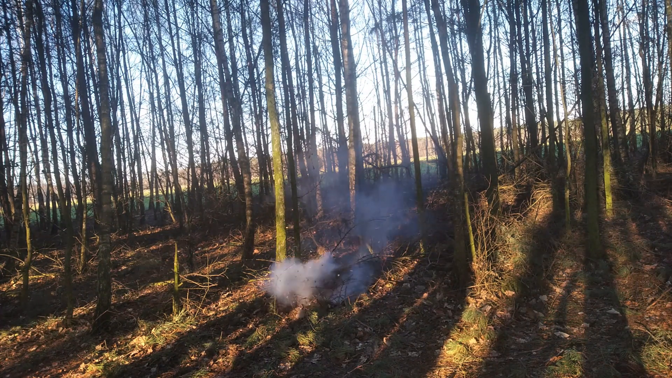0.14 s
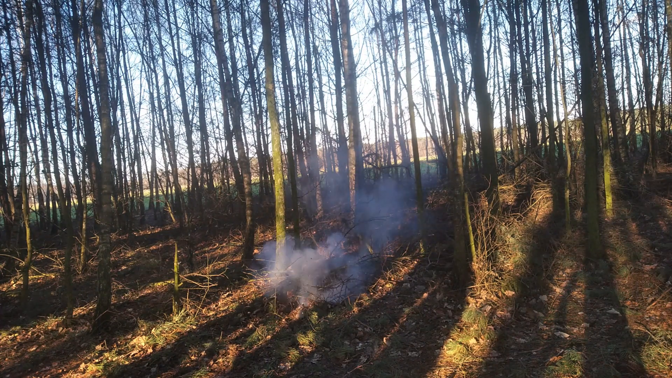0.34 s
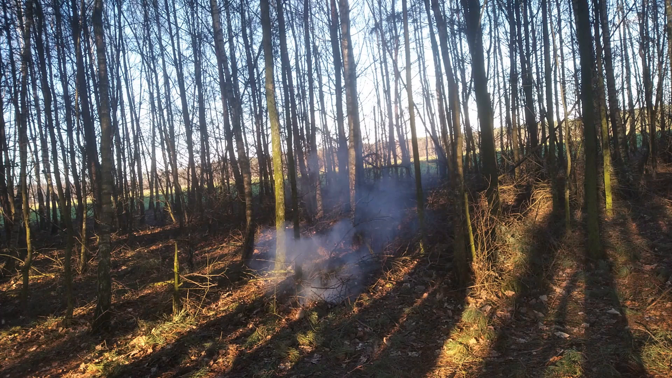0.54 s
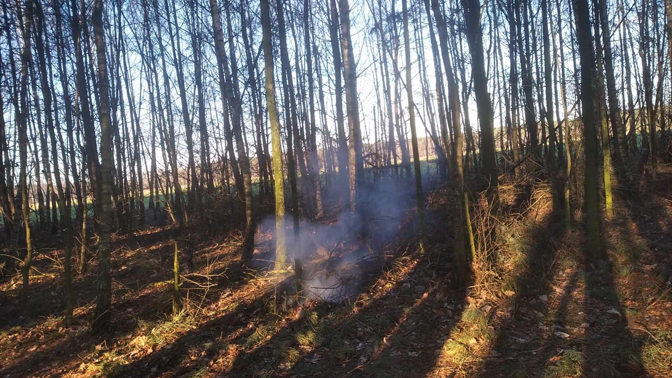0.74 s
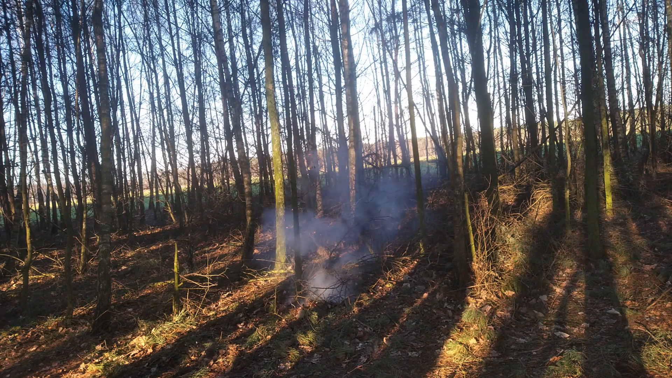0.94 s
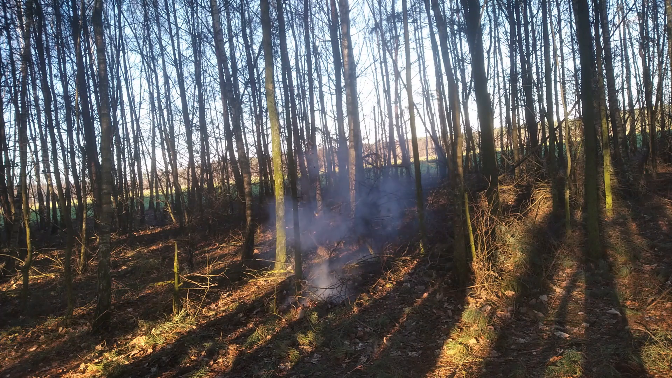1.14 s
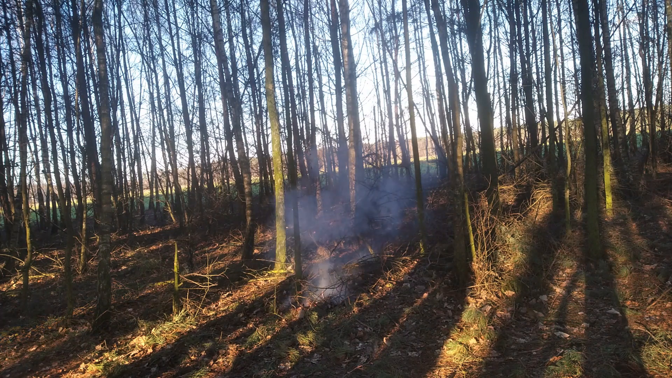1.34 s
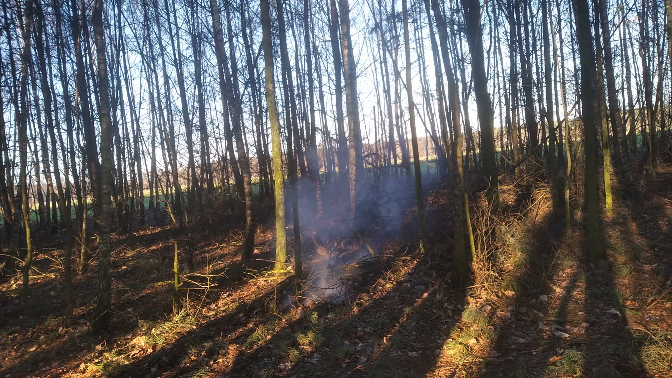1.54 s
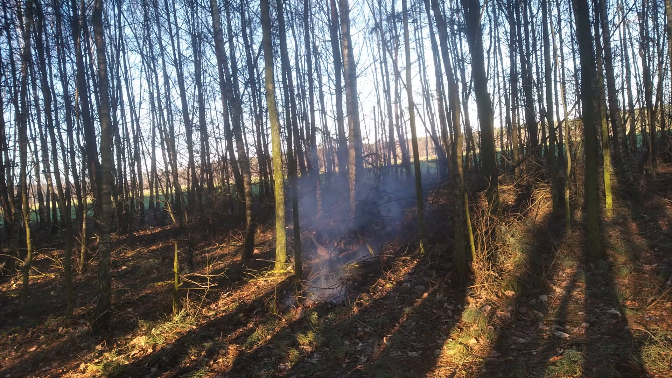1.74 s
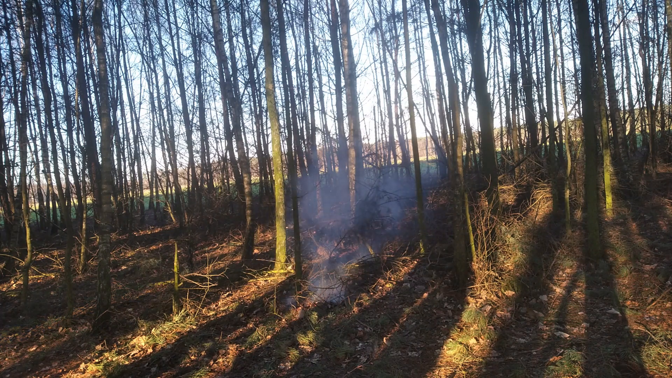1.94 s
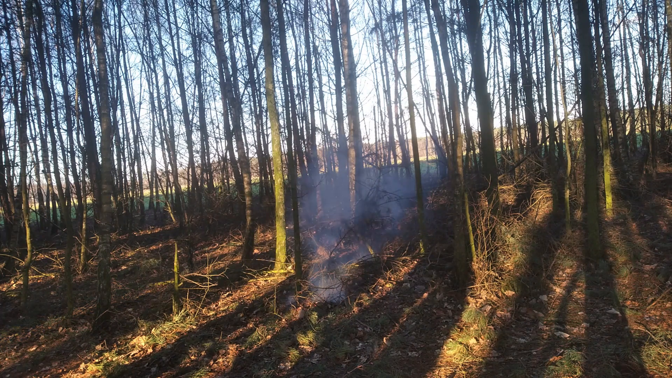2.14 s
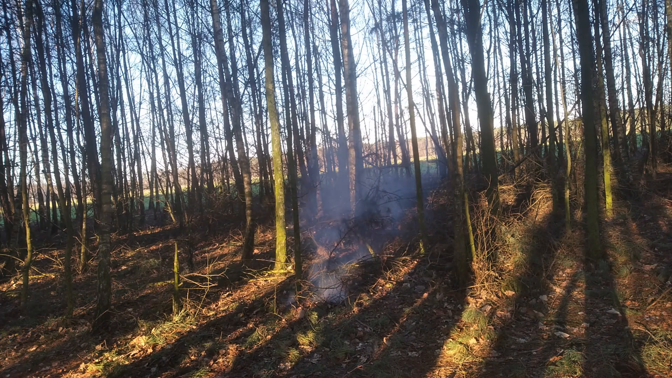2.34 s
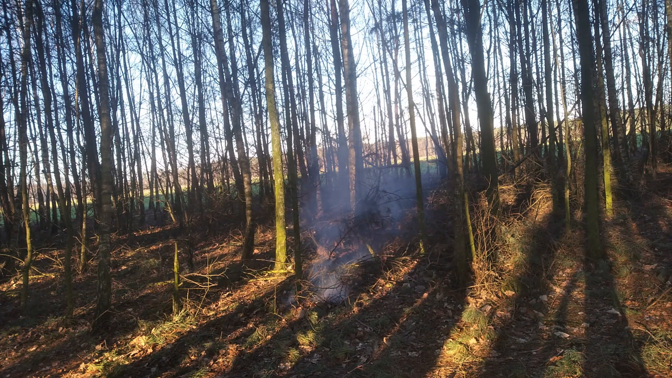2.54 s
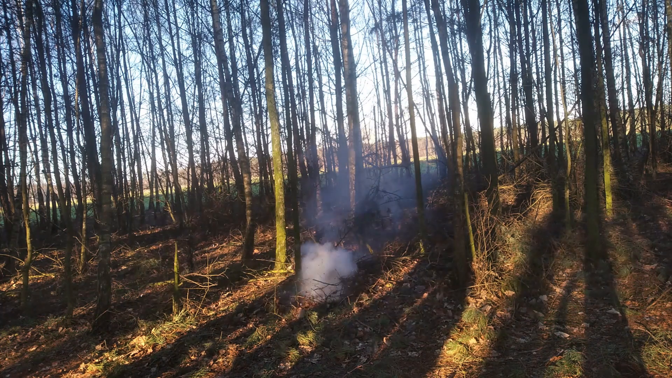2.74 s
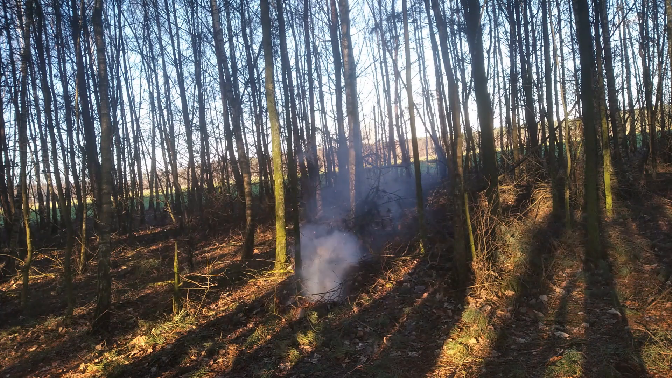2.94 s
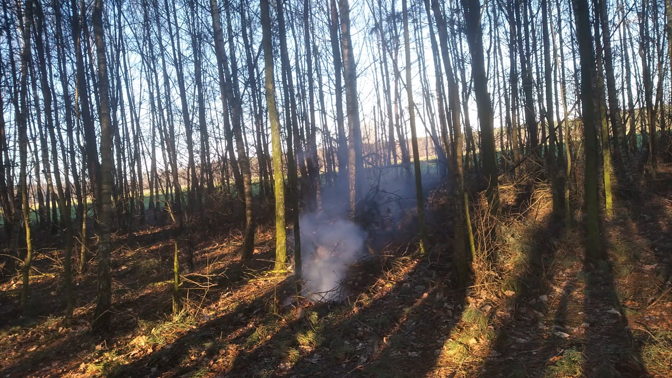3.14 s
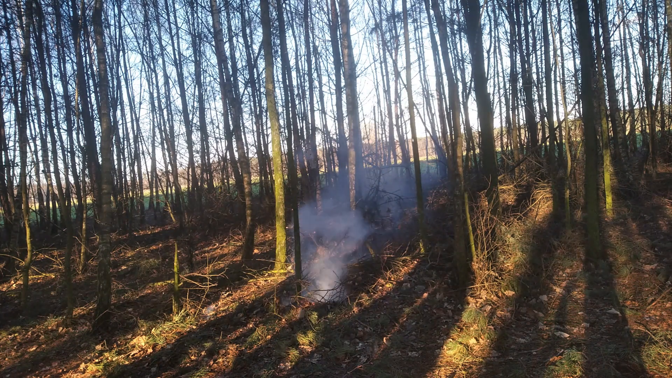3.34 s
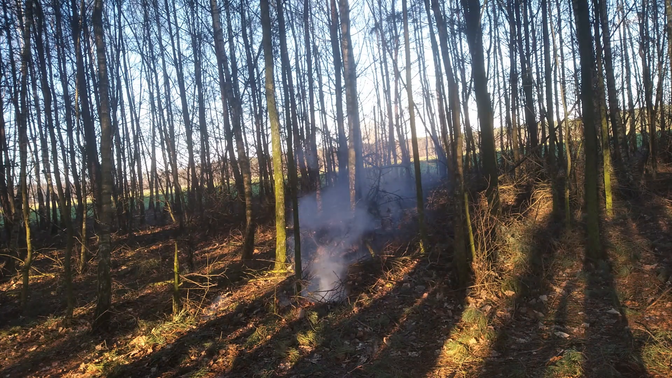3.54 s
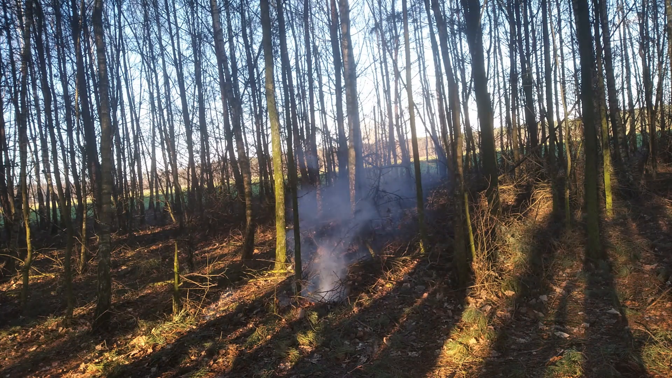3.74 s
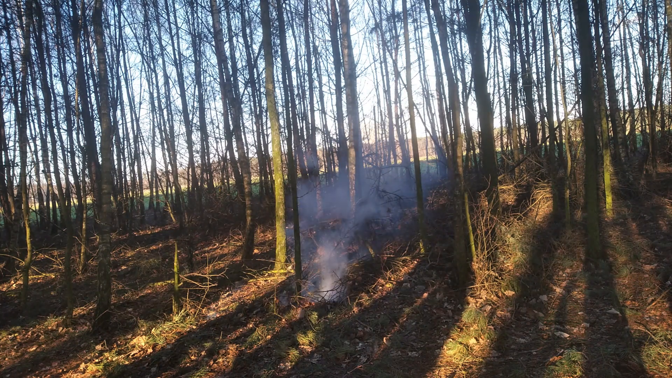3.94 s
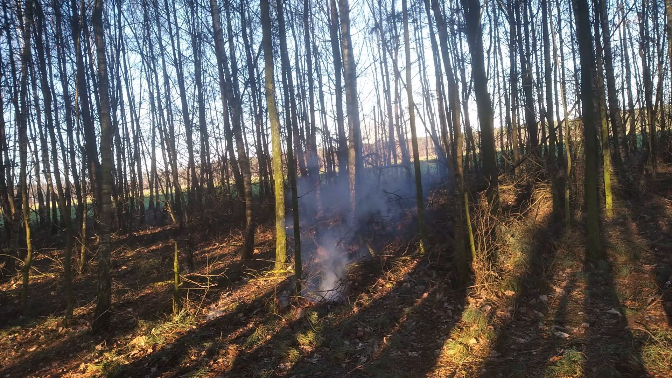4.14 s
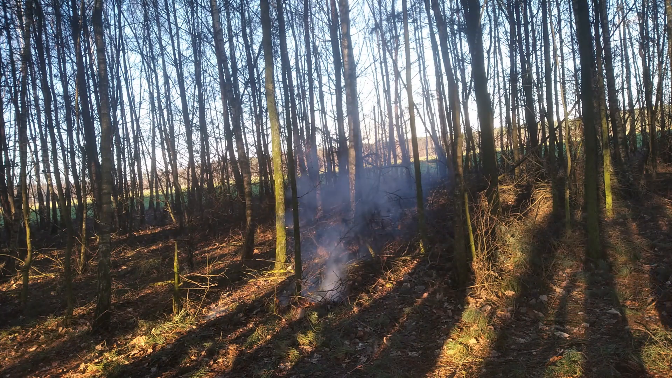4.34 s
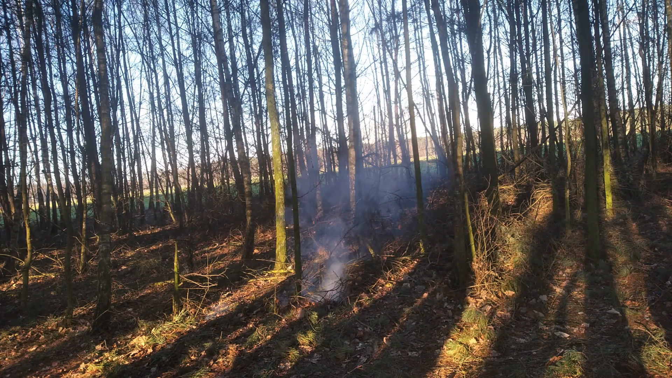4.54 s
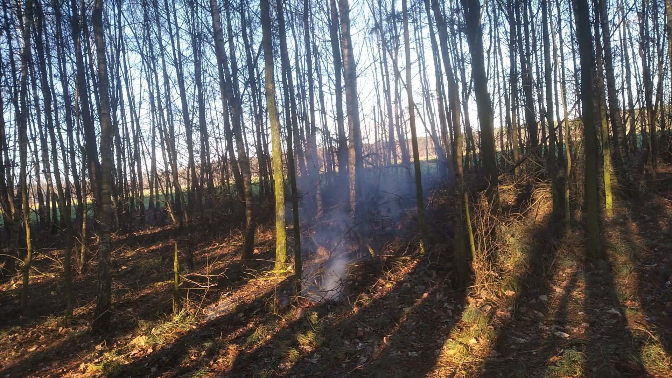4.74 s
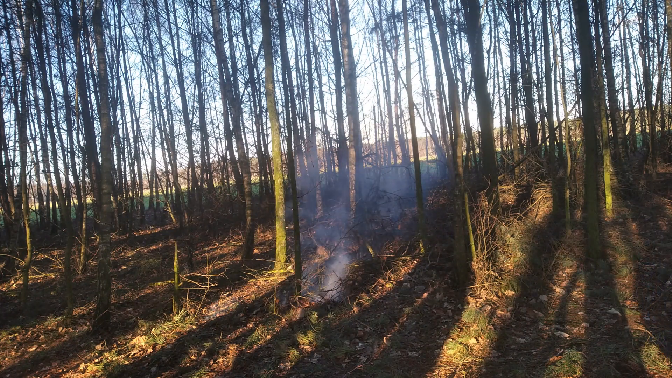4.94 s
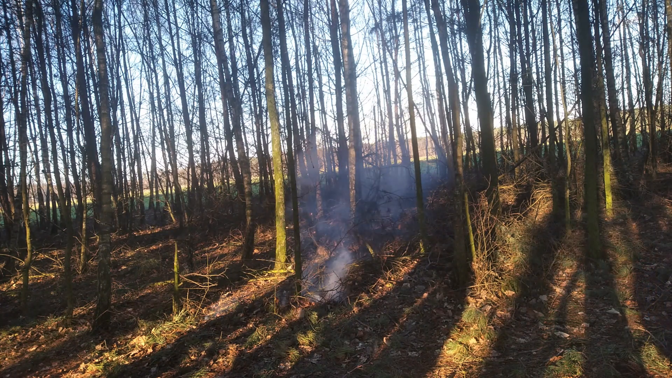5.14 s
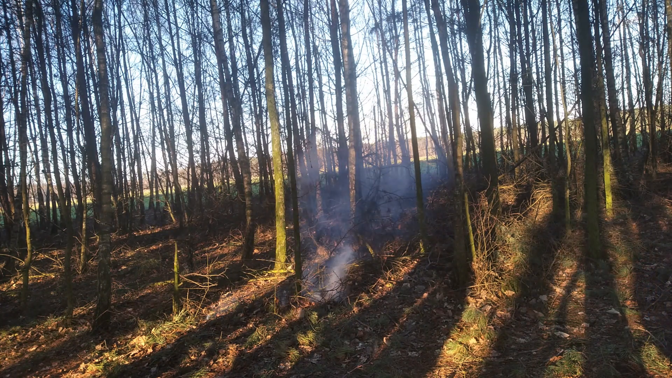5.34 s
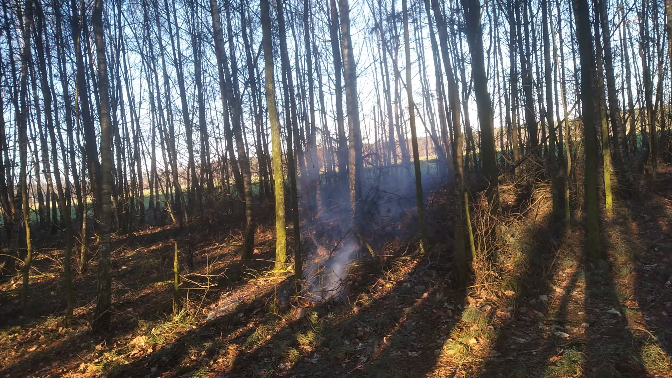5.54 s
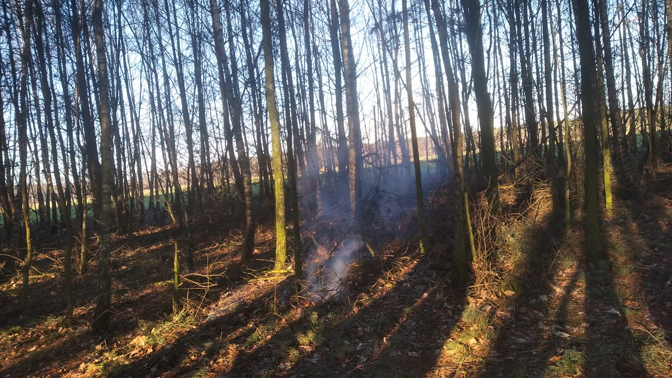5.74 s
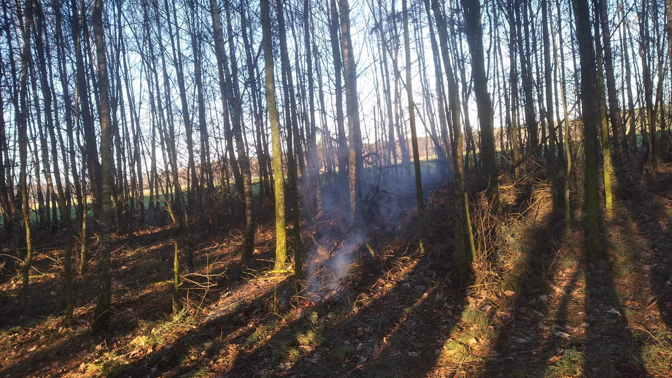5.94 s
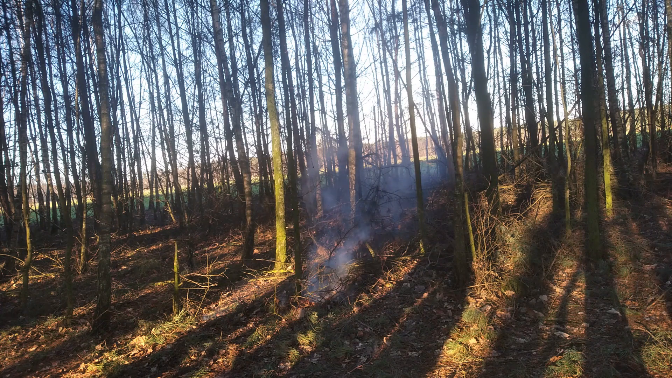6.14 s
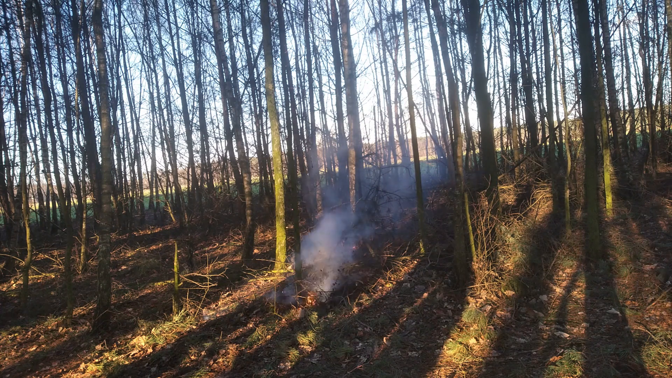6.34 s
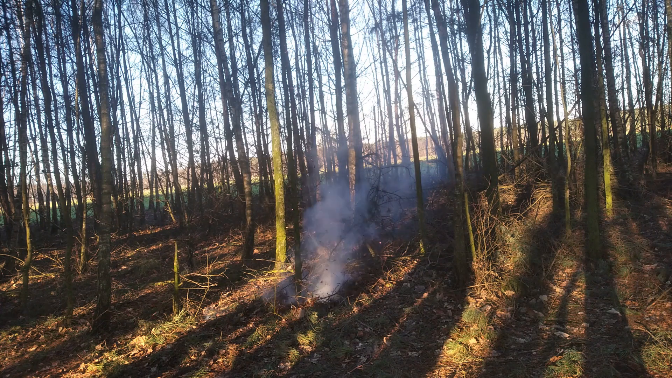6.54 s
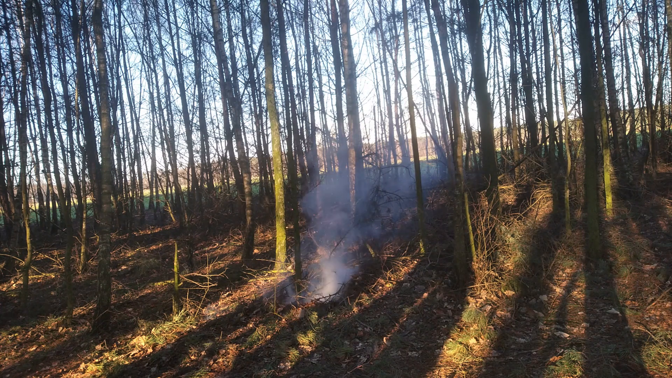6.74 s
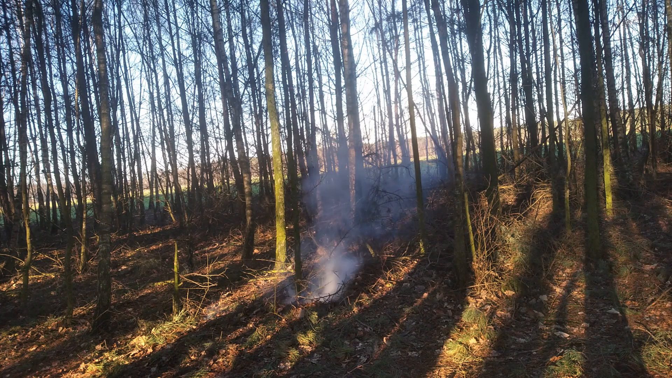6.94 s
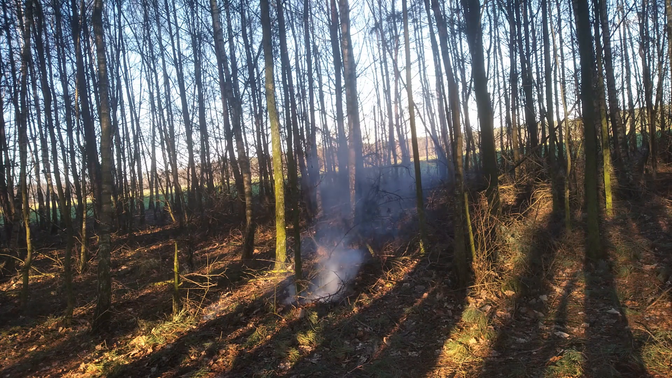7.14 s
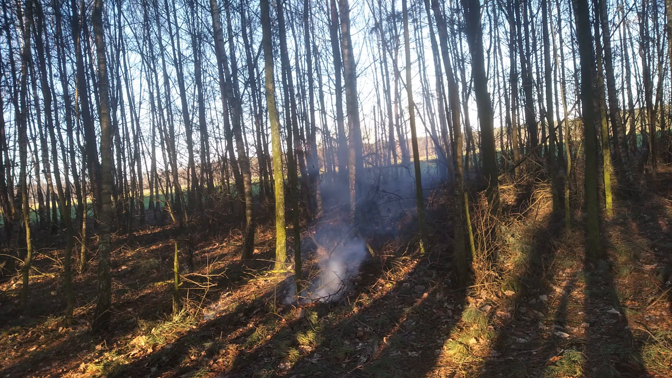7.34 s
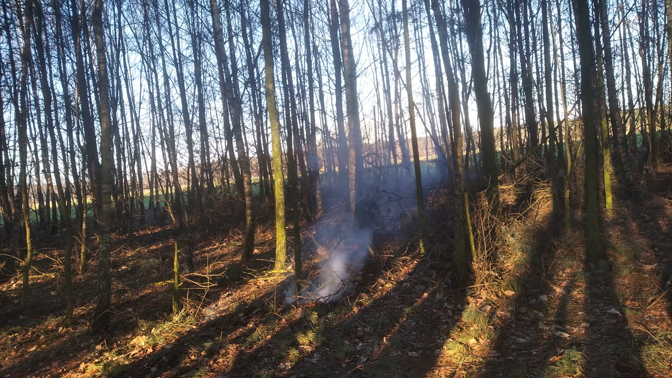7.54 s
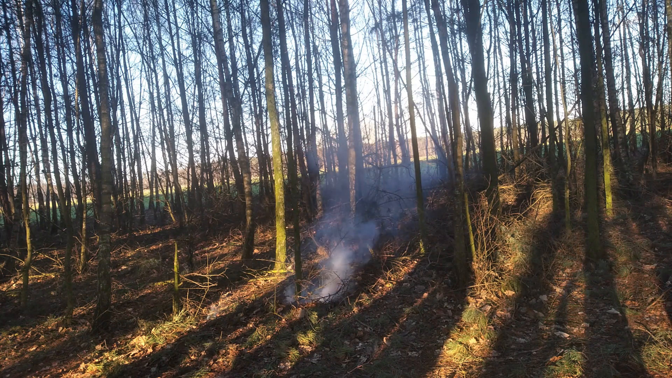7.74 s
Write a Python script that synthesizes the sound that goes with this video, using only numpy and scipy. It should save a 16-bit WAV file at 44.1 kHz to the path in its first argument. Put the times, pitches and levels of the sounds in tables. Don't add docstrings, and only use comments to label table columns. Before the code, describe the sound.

Three small firecrackers explode one by one in a bare wood, each sharp overloaded bang scattering into a long dulling tail, with faint fuse hiss between.

```python
import sys
import numpy as np
from scipy import signal
from scipy.io import wavfile
from scipy.ndimage import uniform_filter1d

SR = 44100
rng = np.random.default_rng(int(sys.argv[2]) if len(sys.argv) > 2 else 0)


def field_ratio(decibels):
    return 10 ** (np.asarray(decibels, dtype=float) / 20)


def unload_audio(sound):
    columns = np.transpose(np.atleast_2d(sound))
    steps = np.round(np.clip(columns, -1, 1) * 32767)
    wavfile.write(sys.argv[1], SR, steps.astype(np.int16))


N = 347508


def evened(x):
    return x / np.sqrt(np.mean(x ** 2) + 1e-20)


def smoothed(grid, rows, columns):
    return uniform_filter1d(uniform_filter1d(grid, size=rows, axis=0), size=columns, axis=1)


def read(points, hz):
    f, value = np.transpose(points)
    return np.interp(np.log(hz + 1), np.log(f + 1), value)


def along(table):
    s, *columns = np.transpose(table)
    return [np.interp(np.arange(N) / SR, s, c) for c in columns]


def arch(start, length):
    u = (np.arange(N) / SR - start) / length
    return np.sin(np.pi * u, where=(u > 0) & (u < 1), out=np.zeros(N))


def add(mix, s, sound):
    part = mix[:, round(s * SR):][:, :sound.shape[1]]
    part += sound[:, :part.shape[1]]


def hiss(count, size, gain, same, side_db, lead=None, patchy_db=1.5):
    hop = size // 4
    t = np.arange(count // hop + 5) * hop / SR
    hz = np.fft.rfftfreq(size, 1 / SR)[:, None]
    a, b, c, d, patches = rng.standard_normal((len(t), len(hz), 5)).T
    patches = evened(smoothed(patches, 7, 11))
    like = np.clip(same(hz), -1, 1)
    right = a + 1j * b
    left = like * right + np.sqrt(1 - like ** 2) * (c + 1j * d)
    if lead:
        left = left * np.exp(1j * lead(hz))
    tilt = field_ratio(side_db(hz) / 2)
    z = np.array([left * tilt, right / tilt]) * gain(hz, t) * field_ratio(patchy_db * patches)
    return signal.istft(z, nperseg=size, noverlap=size - hop)[1][:, :count]


def blast(t):
    u = t / 0.0004
    front = (1 - u) * np.exp(-u)
    return front - 0.15 * np.roll(front, round(0.0015 * SR))


# pitch in Hz, level in dB.
TRUNKS = [(60, -17), (130, -6.5), (280, -3), (500, -2.5), (1000, -3.5), (2200, -4), (5000, -4.5),
          (9000, -5), (12000, -6.5), (17000, -20.5)]
# pitch in Hz, time to fall 60 dB in seconds.
TRUNKS_T60 = [(60, 1.5), (150, 0.8), (400, 1.1), (1000, 1.05), (2500, 0.88), (5000, 0.68), (10000, 0.47),
              (16000, 0.22)]
BEND, STRETCH = 0.88, 1.01
# pitch in Hz, level in dB.
BOOM = [(40, -7.5), (120, 4.5), (300, 13.5), (480, 10), (800, -9.5), (1500, -49.5)]
# pitch in Hz, level in dB.
FAR_EDGE = [(60, -48.5), (140, -44), (220, -53), (330, -20), (500, -15), (900, -16), (2200, -24),
            (4000, -39), (8000, -87.5)]
BOOM_T60, FAR_T60 = 0.17, 1.9
# delay in seconds, spread in seconds, pitch in Hz, width in Hz.
SLOPE = (1.06, .12, 145, 28)
SLOPE_DB = -48.5
# pitch in Hz, likeness from -1 to 1.
TAIL_SAME = [(60, -0.65), (110, 1), (200, 0.68), (380, 0.92), (700, -0.00099), (1290, -0.4), (2380, 0.05),
             (4400, -0.03), (8120, -0.0), (15000, -0.91)]
# pitch in Hz, left over right in dB.
TAIL_SIDE = [(100, 0), (1400, 1), (3500, 0), (6000, 0.5), (7500, -6), (9300, -13), (11000, -6.5),
             (15000, 4)]


def scatter(length):
    delay, spread, slope_hz, width_hz = SLOPE

    def fade(hz, t):
        build = 1 - 0.21 * np.exp(-t / 0.017)
        age = (t / (STRETCH * length * read(TRUNKS_T60, hz))) ** BEND
        near = build * field_ratio(read(TRUNKS, hz) - 60 * age)
        boom = field_ratio(read(BOOM, hz) - 60 * t / BOOM_T60)
        far = field_ratio(read(FAR_EDGE, hz) - 60 * t / FAR_T60)
        late, off_pitch = (t - delay) / spread, (hz - slope_hz) / width_hz
        slope = field_ratio(SLOPE_DB) * np.exp(-late ** 2 / 2 - off_pitch ** 2 / 2)
        return np.sqrt(near ** 2 + boom ** 2 + far ** 2 + slope ** 2)

    tail = hiss(5 * SR // 2, 1024, fade, same=lambda hz: read(TAIL_SAME, hz),
                side_db=lambda hz: read(TAIL_SIDE, hz), patchy_db=0.0)
    return tail / np.sqrt(np.mean(tail[:, :SR // 20] ** 2))


def jolt(t):
    onset = 1 - np.exp(-t / .004)
    left_size = np.exp(-t / .07) + .03 * np.exp(-t / .3)
    left = left_size * np.cos(2 * np.pi * (1 - np.exp(-t / .245))) * onset
    right_size = 4.5 * np.exp(-t / .035) + .37 * np.exp(-(t / .42) ** 2)
    right = right_size * np.sin(3 * np.pi * np.tanh((t + .008) / .33)) * onset
    return np.array([left, right])


# start in seconds, blast level in dB, tail level in dB, tail length factor.
BANGS = [
    (0.0517, 21, 10.5, 0.98),
    (2.6188, 21.5, 9.5, 0.99),
    (6.2090, 9, 9.5, 1.0),
]
JOLTS = [
    (.15, -1.15),
    (8.0, -.8),
    (1.2, -1.0),
]


def bangs():
    out, t = np.zeros((2, N)), np.arange(5 * SR // 2) / SR
    for (s, blast_db, tail_db, length), lurch in zip(BANGS, JOLTS):
        tail = scatter(length) * (1 - np.exp(-t / 0.00083))
        shock = field_ratio(blast_db) * blast(t)
        add(out, s, shock + field_ratio(tail_db) * tail + jolt(t) * np.array(lurch)[:, None])
    return out


# time in seconds, burn level in dB, sputter share in dB.
SMOULDER = [(0, -60, -11), (.55, -58.5, -10), (.75, -54, -7), (1.8, -54, -7), (2.3, -56.5, -6.5),
            (2.6, -53.5, -9.5), (3.3, -55.5, 0), (3.55, -58.5, -24), (3.86, -57.5, -20),
            (4.25, -54.5, -3.5), (4.6, -57, -4.5), (5.4, -56, -4), (6.1, -59, -8.5), (6.9, -55, -3.5),
            (7.15, -57, -21), (7.6, -54.5, -4.5), (7.88, -57.5, -2.5)]
# start in seconds, length in seconds, level in dB, sputter share in dB.
FLARES = [
    (0.676, 0.56, -53.5, -4.5),
    (1.29, .3, -56.5, -8),
    (3.878, 0.19, -49.5, -11.5),
    (3.994, 0.2, -47.5, -12.5),
    (4.244, 0.28, -60, -1),
    (6.148, .02, -54, -8),
    (7.262, 0.31, -47, -6.5),
    (7.346, 0.057, -45, -9),
]
FLARE_EDGE = 0.68
# pitch in Hz, level in dB.
FIZZ = [(2350, -40), (4000, -4), (6110, -0.5), (6980, 0.5), (8050, 2), (10200, 0), (11100, -3),
        (13700, -3.5), (14200, -12.5)]
# pitch in Hz, level in dB.
SPUTTER = [(500, -21), (1000, -7.5), (1600, -1), (2200, 1.5), (3300, 1), (5000, -0.5), (8000, -17.5),
           (12000, -62.5)]
# pitch in Hz, likeness from 0 to 1.
FUSE_SAME = [(900, 0.96), (3300, 0.76), (5000, 0.22), (7000, .4), (10000, .35), (14000, 0.23)]
# pitch in Hz, left over right in dB.
FUSE_SIDE = [(900, -1), (3300, 2), (6000, 0), (7500, -5), (9200, -13), (11000, -6), (14000, 0.5)]
# pitch in Hz, lead in radians.
FUSE_LEAD = [(3400, -.2), (5900, -2.2), (8400, -2.3), (11300, -.3)]


def fuse():
    burn_db, dull_db = along(SMOULDER)
    bright, dull = field_ratio(2 * burn_db), field_ratio(2 * (burn_db + dull_db))
    for start, length, db, share_db in FLARES:
        power = (field_ratio(db) * arch(start, length) ** FLARE_EDGE) ** 2
        bright = bright + power
        dull = dull + power * field_ratio(2 * share_db)
    place = dict(same=lambda hz: read(FUSE_SAME, hz), side_db=lambda hz: read(FUSE_SIDE, hz),
                 lead=lambda hz: read(FUSE_LEAD, hz))
    fizz = hiss(N, 256, lambda hz, t: field_ratio(read(FIZZ, hz)) * (hz < 14250), patchy_db=1.1, **place)
    sputter = hiss(N, 512, lambda hz, t: field_ratio(read(SPUTTER, hz)), patchy_db=-1.06, **place)
    flicker = evened(uniform_filter1d(rng.standard_normal(N), size=500))
    burn = np.sqrt(bright) * evened(fizz) + np.sqrt(dull) * evened(sputter)
    return field_ratio(7.5 + 1.1 * flicker) * burn


# start in seconds, peak in dB, ring in Hz, left over right in dB, swell in ms.
SPITS = [
    (4.4413, -29.5, 8600, -4, 0.42),
    (4.813, -37.5, 10000, -1, 0.29),
    (5.0708, -20, 7400, -5.5, 0.062),
    (5.0714, -32.5, 2540, 6, 0.12),
    (5.862, -34.5, 6000, -1.5, .06),
    (6.1513, -34, 9630, -7, .15),
    (6.155, -31, 7120, -4, 0.099),
    (6.1558, -31.5, 9960, 0, .2),
    (6.953, -29, 7500, -5, .08),
    (7.388, -28, 2500, -4.5, 0.061),
]
PATTER = .38


def spits():
    out, t = np.zeros((2, N)), np.arange(400) / SR
    leaf_band = signal.butter(2, [1500, 12500], "bandpass", fs=SR)
    for s, db, hz, pan_db, swell_ms in SPITS:
        u = t / (swell_ms / 1000)
        ring = -np.sin(2 * np.pi * hz * t) * u * np.exp(1 - u)
        patter = PATTER * rng.standard_normal((2, len(t))) * np.exp(-t / .0008)
        patter = signal.lfilter(*leaf_band, patter)
        add(out, s, field_ratio(db) * (ring + patter) * field_ratio([[pan_db / 2], [-pan_db / 2]]))
    return out


# middle in seconds, length in seconds, level in dB, left over right in dB.
PUFFS = [(0.034, 0.051, -39, -10), (.78, 0.22, -50, 8), (1.31, 0.163, -46, 8), (1.4, 0.114, -46.5, 12.5),
         (1.57, .06, -56, -10), (1.645, 0.082, -53, 9), (1.817, 0.11, -56.5, 3.5), (2.03, .14, -64.5, 3),
         (2.5, 0.25, -58, -8), (3.555, .5, -69, 6), (4.12, .16, -54.5, -8), (4.38, .2, -58.5, -13),
         (4.66, 0.11, -55, -21), (4.78, 0.13, -48.5, 12), (4.99, 0.15, -40.5, 17), (5.106, 0.085, -49, 6),
         (5.205, .08, -48, -1), (5.362, .2, -54.5, -6), (5.52, 0.087, -64.5, 4), (5.85, 0.25, -48, 1),
         (6.08, 0.19, -58, 1), (7.01, .12, -44.5, -5), (7.26, 0.28, -53, 9), (7.65, .1, -49, 21),
         (7.779, 0.049, -44, 11), (7.834, 0.045, -42, 10)]
# pitch in Hz, level in dB.
GUST = [(15, -3.5), (40, 10), (70, -6.5), (120, -14.5), (170, -25.5), (260, -35), (400, -62)]
LULL_DB = -64
LUMP_EVENING = .45
FLUTTER_HZ, FLUTTER_FROM_DB, FLUTTER_SLOPE = 70, -46, .7
RUMBLE_DB, RUMBLE_HZ = -52, 22.2


def wind():
    power = np.full((2, N), field_ratio(2 * LULL_DB))
    for middle, length, db, pan_db in PUFFS:
        sides = field_ratio([[2 * db + pan_db], [2 * db - pan_db]])
        power = power + sides * arch(middle - length / 2, length) ** 2
    bumps = hiss(N, 2048, lambda hz, t: field_ratio(read(GUST, hz)), same=lambda hz: 0.61 + 0 * hz,
                 side_db=lambda hz: 0 * hz, patchy_db=3.3)
    lumps = abs(uniform_filter1d(bumps ** 2, size=3000, axis=1)) + 1e-20
    bumps = bumps / lumps ** (LUMP_EVENING / 2)
    fast = signal.butter(2, FLUTTER_HZ, "highpass", fs=SR, output="sos")
    flutter = signal.sosfilt(fast, bumps)
    hard = 1 / (1 + (field_ratio(2 * FLUTTER_FROM_DB) / power) ** FLUTTER_SLOPE)
    puffs = np.sqrt(1 - hard) * evened(bumps) + 0.66 * np.sqrt(hard) * evened(flutter)
    low = signal.butter(2, [3, RUMBLE_HZ], "bandpass", fs=SR, output="sos")
    rumble = signal.sosfilt(low, rng.standard_normal((2, N)))
    return puffs * np.sqrt(power) + field_ratio(RUMBLE_DB) * evened(rumble)


# pitch in Hz, level in dB.
AIR = [(53, -43.5), (90, -17.5), (189, -8), (225, -10.5), (260, -13.5), (292, -5.5), (462, -3.5),
       (666, -6.5), (1500, -13), (1950, -35), (3300, -120)]
AIR_DB = -60.5


def air():
    murmur = hiss(N, 1024, lambda hz, t: field_ratio(read(AIR, hz)), same=lambda hz: .6 + 0 * hz,
                  side_db=lambda hz: 0 * hz, patchy_db=-0.6)
    return field_ratio(AIR_DB) * evened(murmur)


def scene():
    return bangs() + fuse() + spits() + wind() + air()


HOLE_FROM_HZ, HOLE_RARITY, HOLE_DB, HOLE_BELOW_DB = 2500, 2.2, -30, -19
MASKED_DB, MORE_PER_MASKED_DB, CALM_DB, MORE_PER_BUSY_DB = 26, .08, -49, .1
SPARED_HZ = 8200, 10800


def thinned(x):
    hz, _, z = signal.stft(x, SR, nperseg=1024, noverlap=512)
    chance = rng.standard_normal(z.shape[:0:-1]).T
    chance = evened(smoothed(chance, 4, 6))
    power = (abs(z) ** 2).mean(0) * (hz > 300)[:, None] + 1e-14
    whole_db = 10 * np.log10(power.sum(0))
    masked_db = whole_db - 10 * np.log10(smoothed(power, 21, 5))
    rarity = HOLE_RARITY - MORE_PER_MASKED_DB * (masked_db - MASKED_DB)
    rarity = rarity - MORE_PER_BUSY_DB * np.clip(whole_db - CALM_DB, 0, 6)
    exposed = (hz > HOLE_FROM_HZ) & ((hz < SPARED_HZ[0]) | (hz > SPARED_HZ[1]))
    depth = np.clip(4 * (chance - np.maximum(rarity, 1)), 0, 1)
    depth = depth * exposed[:, None] * (whole_db < HOLE_BELOW_DB)
    return signal.istft(z * field_ratio(HOLE_DB * depth), SR, nperseg=1024, noverlap=512)[1][:, :N]


def roll_off(x):
    return signal.sosfilt(signal.butter(12, 15750, fs=SR, output="sos"), x)


# from seconds, to seconds.
DROPOUTS = [
    (.0435, .0465),
    (2.6, 2.613),
    (6.197, 6.2035),
]


def record(dry):
    t = np.arange(N) / SR
    lost = sum((t > a) & (t < b) for a, b in DROPOUTS)
    kept = 1 - .9 * uniform_filter1d(lost * 1., size=60)
    dry = thinned(dry)
    slow = uniform_filter1d(dry, size=400, axis=1)
    mix = np.clip(slow + kept * (dry - slow), -1, 1)
    return roll_off(mix)


dry = scene()
out = record(dry)
unload_audio(out)
```